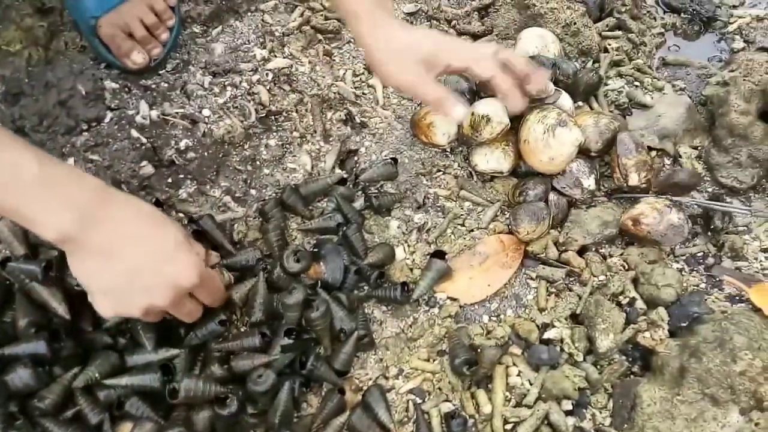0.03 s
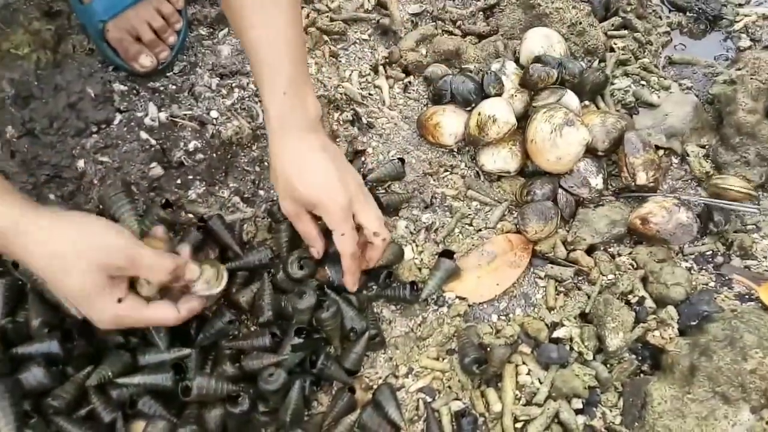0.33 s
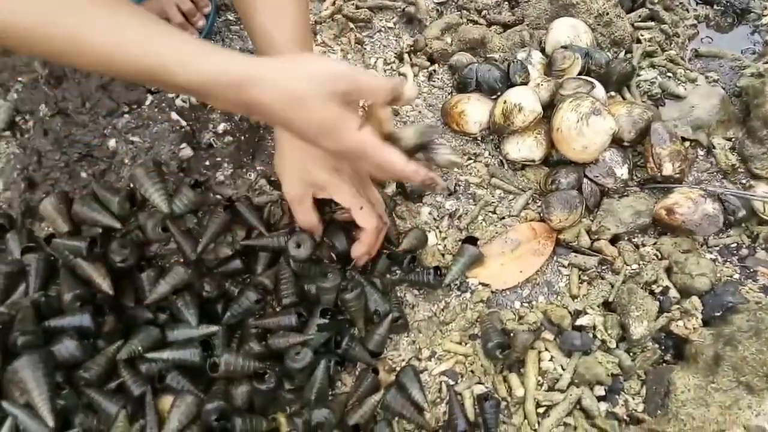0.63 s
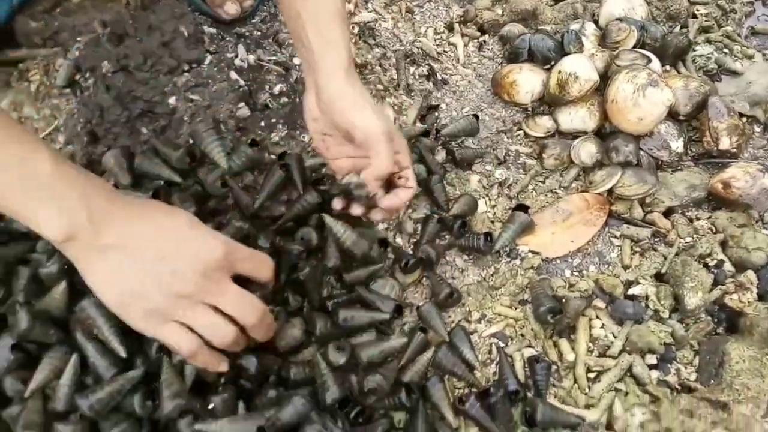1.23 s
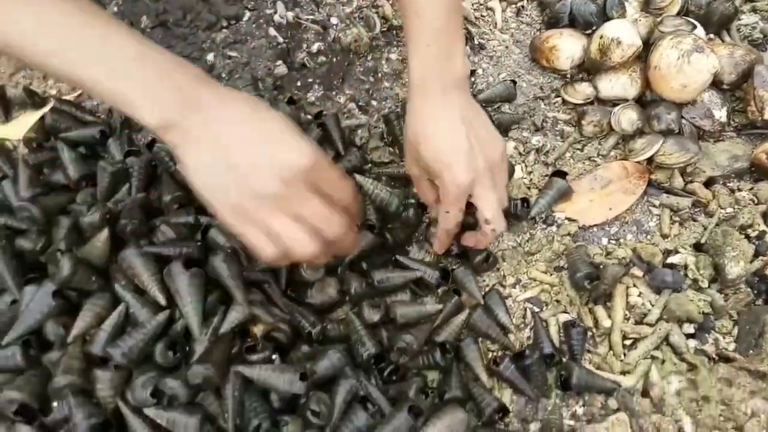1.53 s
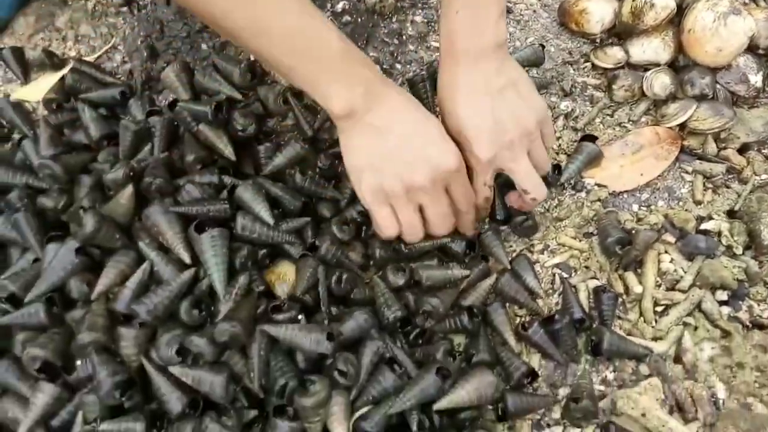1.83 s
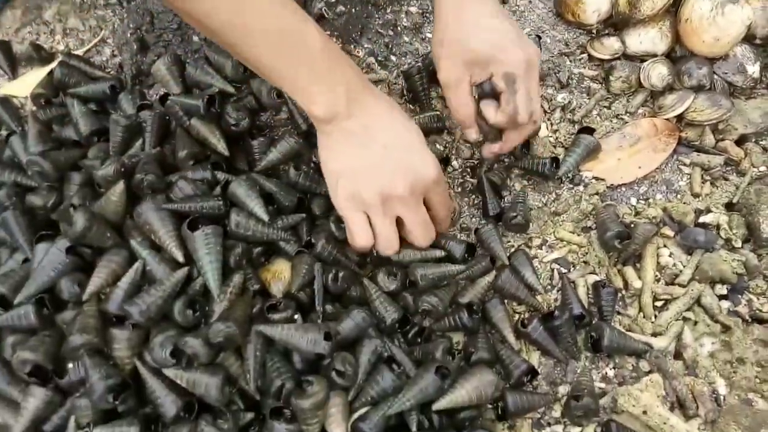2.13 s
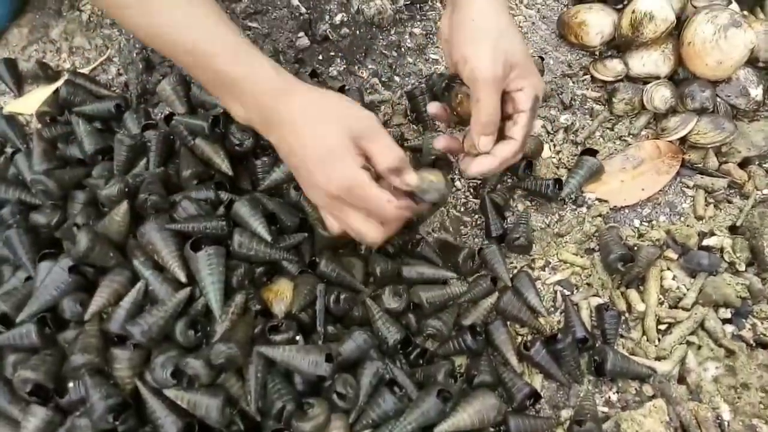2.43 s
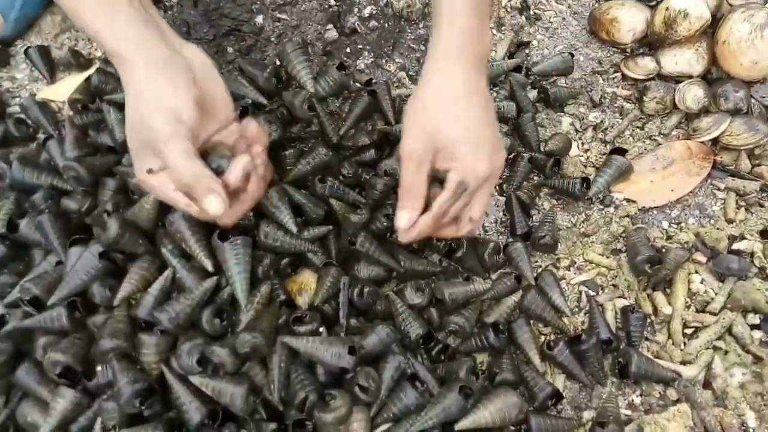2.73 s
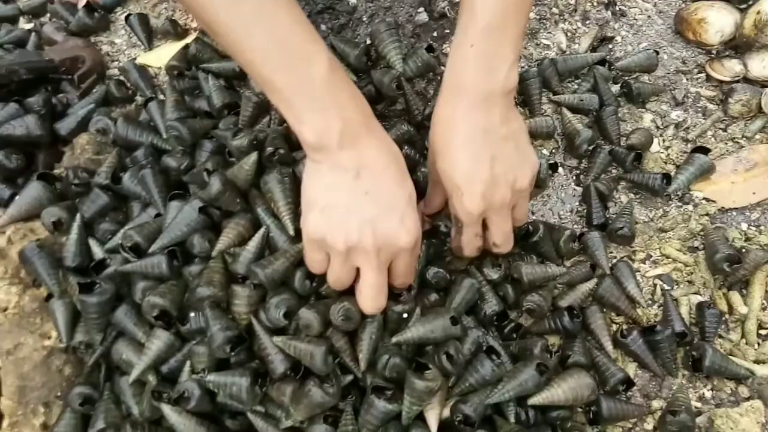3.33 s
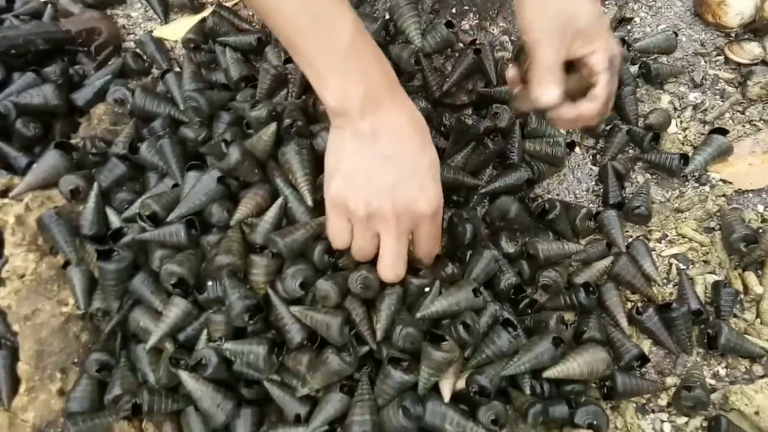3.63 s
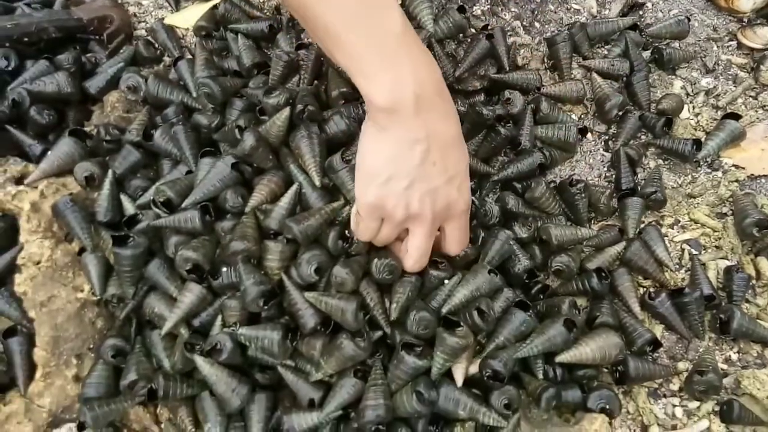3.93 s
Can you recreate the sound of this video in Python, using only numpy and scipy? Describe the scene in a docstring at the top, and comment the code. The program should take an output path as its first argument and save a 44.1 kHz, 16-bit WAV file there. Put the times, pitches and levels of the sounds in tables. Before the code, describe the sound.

Hands sort through a pile of snail shells, which click, knock and scrape together.

```python
"""Two hands rake through a heap of hard, pointed snail shells on open ground, over faint outdoor air.
From the start, shells knock on their neighbours, skid briefly and ring for a few milliseconds, while
the stirred heap swells into a clatter and grate beneath them. After a second the hands add dull bumps.
Near 2.4 s the heap almost settles; the raking goes on gently, then digs in again just before the end."""
import sys
import numpy as np
from scipy import signal
from scipy.fft import rfft, irfft
from scipy.io import wavfile

SR = 44100
rng = np.random.default_rng(int(sys.argv[2]) if len(sys.argv) > 2 else 0)


def output_pcm(signal):
    """Save a mono or channel-first signal as 16-bit PCM at the path in sys.argv[1].

    Samples are clipped to [-1, 1] before scaling.
    """
    pcm = np.clip(np.atleast_2d(signal).T, -1, 1) * 32767
    wavfile.write(sys.argv[1], SR, np.round(pcm).astype(np.int16))


N = 176400


def from_db(db):
    """Decibels to gain."""
    return 10 ** (np.asarray(db) / 20)


def rms_one(x):
    """Scale to an rms of 1."""
    return x / np.sqrt(np.mean(x ** 2) + 1e-20)


def one_ms(x):
    """Scale to the energy of one millisecond at full level."""
    return x / np.sqrt(np.sum(x ** 2) * 1000 / SR + 1e-20)


def add(out, start_s, x):
    """Mix a short sound in at its cue."""
    i = int(np.clip(start_s * SR, 0, N - 1))
    out[i:i + len(x)] += x[:N - i]


def band(x, hz, kind, order=4):
    """Butterworth filter."""
    return signal.sosfilt(signal.butter(order, hz, kind, fs=SR, output="sos"), x)


def equalise(x, curve):
    """Apply a smooth EQ curve, with minimum phase so that nothing sounds ahead of an attack."""
    hz, db = np.transpose(curve)
    size = len(x)
    bin_hz = np.arange(size // 2 + 1) * SR / size
    log_gain = np.log(from_db(np.interp(np.log(bin_hz + 1), np.log(hz), db)))
    causal = np.zeros(size)
    causal[0], causal[1:size // 2] = 1, 2
    response = np.exp(rfft(irfft(log_gain, size) * causal))
    return irfft(rfft(x) * response, size)


# Tone of the outdoor bed: frequency_hz, gain_db
AIR_EQ = [(25, -8.5), (60, -7), (110, 5.5), (170, 2.5), (260, -10), (600, -8), (2000, -9), (9000, -45),
          (15000, -13)]

def outdoor_air(level_db=-57):
    """A faint, steady bed of noise, weighted to the lows."""
    return from_db(level_db) * rms_one(equalise(rng.standard_normal(N), AIR_EQ))


# Dull bumps of the hands: start_s, level_db (before trim), pitch_hz
HAND_BUMPS = [(1.046, -38.5, 171), (1.224, -35, 108), (1.271, -39, 139), (1.346, -45.5, 94),
              (1.407, -45, 79.5), (1.66, -36, 170), (1.744, -36.5, 186.6), (1.774, -44, 197),
              (1.995, -40, 112), (2.197, -39.5, 107), (2.314, -39.5, 93), (3.512, -42.5, 176)]

def hand_bumps(rise_s=0.014, trim_db=-3.5):
    """A hand presses into the heap: a short swell of rough rumble around one low resonance."""
    out, t = np.zeros(N), np.arange(SR // 5) / SR
    swell = t / rise_s * np.exp(1 - t / rise_s)
    for start_s, level_db, pitch_hz in HAND_BUMPS:
        rumble = rms_one(band(rng.standard_normal(len(t)), [pitch_hz / 2, pitch_hz * 2], "band", order=2))
        resonance = np.sin(2 * np.pi * pitch_hz * t)
        add(out, start_s, from_db(level_db + trim_db) * swell * (.5 * rumble + .72 * resonance))
    return out


KNOCK_SAMPLES, LEAD_S = 2048, .004  # length of one knock; its scrape ahead of the hit
SHELL_LOWEST_HZ = 623  # a shell radiates little below this
LOWS_HZ, TREBLE_HZ = 2280, 7030  # crossovers between hollow lows, mid clack and hard treble


def contacts(per_s, spread_db):
    """Shell touching shell: random clicks of uneven size."""
    sizes = from_db(spread_db * np.minimum(rng.exponential(1, N), 3)) * rng.choice([-1, 1], N)
    return sizes * (rng.random(N) < per_s / SR)


def skid(decay_ms, contacts_per_s=5000):
    """Shells scrape together, meet hard once, and skid on in a dying run of smaller contacts."""
    hit = int(LEAD_S * SR)
    t_ms = (np.arange(KNOCK_SAMPLES) - hit) * 1000 / SR
    envelope = np.where(t_ms < 0, .3, .77) * np.exp(-np.abs(t_ms) / max(decay_ms, .1))
    force = envelope * rng.standard_normal(KNOCK_SAMPLES)
    force *= rng.random(KNOCK_SAMPLES) < contacts_per_s / SR
    force[hit] = 1
    return force


def mode(force, hz, t60_s):
    """One resonance that dies by 60 dB in t60_s; gain 1 at its peak."""
    r = from_db(-60 / (t60_s * SR))
    feedback = [1, -2 * r * np.cos(2 * np.pi * hz / SR), r * r]
    return signal.lfilter(np.array([1, 0, -1]) * (1 - r * r) / 2, feedback, force + 1e-18)


def shell(force, count=14, t60_s=0.0045):
    """No two shells are alike: each has its own scatter of short modes."""
    edges_hz = np.linspace(400, 16000, count + 1)
    modes_hz = rng.uniform(edges_hz[:-1], edges_hz[1:])
    gains = rng.uniform(0.26, 1, count) * (-1) ** np.arange(count)
    return sum(mode(force, hz, t60_s) * gain for hz, gain in zip(modes_hz, gains))


def main_ring(force, hz, skid_ms, detune=0.031, free_t60_s=0.0076, pinned_below_ms=0.45):
    """Two meeting shells ring close in pitch; a very short skid means they are pinned and damped."""
    t60_s = free_t60_s * np.clip(skid_ms / pinned_below_ms, .1, 1)
    return one_ms(mode(force, hz * (1 - detune), t60_s) - mode(force, hz * (1 + detune), t60_s))


def with_reflections(x, wet_db=-6, t60_s=0.043):
    """Add a short wash off the heap, the ground and the arms, different for every spot in the heap."""
    t = np.arange(KNOCK_SAMPLES) / SR
    wash = rng.standard_normal(len(t)) * from_db(-60 * t / t60_s) * (t > .002)
    wash /= np.sqrt(np.sum(wash ** 2))
    return x + from_db(wet_db) * signal.fftconvolve(x, wash)[:len(x)]


def small_knock(hz):
    """One tick in the heap: loose shells ping, pinned ones only click, and big, low ones are drier."""
    skid_ms = 3.4 * 2 ** rng.uniform(-2, 1)
    force = skid(skid_ms)
    looseness_db = rng.uniform(-7, 7)
    ping_db = -2 + 4.5 * np.log2(hz / 9500) + looseness_db
    ping = from_db(ping_db) * main_ring(force, hz, skid_ms)
    click = with_reflections(one_ms(shell(force)))
    return one_ms(click + ping)


def clatter(stir_db, full_stir_db=-33, full_per_s=700, shells=160):
    """Small knocks on shells of all pitches; harder stirring packs them thicker, at an even power."""
    voices = [small_knock(hz) for hz in np.linspace(1900, 12500, shells)]
    density = np.clip(from_db(1.1 * (stir_db - full_stir_db)), .15, 1)
    clicks = contacts(full_per_s * density, spread_db=3.3) / np.sqrt(density)
    struck, out = rng.integers(0, shells, N), np.zeros(N)
    for i in np.flatnonzero(clicks):
        add(out, i / SR, clicks[i] * voices[struck[i]])
    return rms_one(out)


# Tone of the shells, for the heap and the clear knocks alike: frequency_hz, gain_db
SHELL_EQ = [(50, -31), (120, -6), (330, -12.5), (780, -12.5), (1370, -9), (1780, -6.5), (3010, -1.5),
            (5730, -8), (6220, -8), (7970, -9.5), (10000, -3), (13500, -20), (15400, -11.5)]
# Level ride of the stirring, before trims: time_s, body_db, treble_db
STIRRING = [(0, -48.5, -47), (0.11, -48, -45), (0.17, -43.5, -51), (0.25, -38.5, -48), (0.33, -32.5, -51),
            (0.4, -32.5, -40), (0.502, -34, -40.5), (0.8, -36.5, -44), (0.85, -33.5, -38),
            (0.895, -45, -45), (0.97, -41, -37.5), (1.1, -36, -39.5), (1.22, -33, -32.5),
            (1.365, -38.5, -40), (1.41, -33, -37), (1.6, -34.5, -38), (1.68, -40.5, -43), (1.9, -41, -45.5),
            (2.03, -33.5, -39), (2.2, -41, -45.5), (2.275, -50, -51), (2.42, -59.5, -56.5),
            (2.56, -46.5, -48), (2.61, -40, -52.5), (2.75, -40.5, -47), (2.92, -44, -45.5),
            (3.02, -42.5, -49), (3.16, -46, -47.5), (3.23, -46.5, -40.5), (3.42, -46, -44.5),
            (3.68, -36.5, -42.5), (3.74, -33, -35.5), (3.92, -41.5, -44), (4, -39, -49)]

def stirred_heap(trim_db=-1, extra_treble_db=-2):
    """The heap shifts under the hands: a clatter of small knocks and the fine grating of ribbed shells."""
    time_s, *rides = np.transpose(STIRRING)
    body_db, treble_db = (np.interp(np.arange(N) / SR, time_s, db) + trim_db for db in rides)
    grit = from_db(-4.5) * rms_one(contacts(per_s=2500, spread_db=4.5))
    texture = equalise(clatter(body_db) + grit, SHELL_EQ)
    body = from_db(body_db) * rms_one(band(texture, TREBLE_HZ, "low"))
    treble = from_db(treble_db + extra_treble_db) * rms_one(band(texture, TREBLE_HZ, "high"))
    return body + treble


# Foreground hits, before trims; the hollow lows and hard treble are relative to the clack:
# hit_s, clack_db, hollow_db, hard_db, skid_ms, ring_hz, ring_db
CLEAR_KNOCKS = [(0.0209, -20.5, -4, -4.5, 2.6, 9200, -27), (0.083, -37, -14, -1, 1.5, 9630, -32),
                (0.1347, -23.5, -16, -9, 9.6, 4000, -28), (0.1782, -21, -14, -17, 1.9, 3530.0, -38),
                (0.1943, -23.5, -15.5, -14, 0.91, 2010, -22), (0.2597, -39, 13, 3, 1.6, 866, -26.5),
                (0.29, -26, -13, -3, 2.2, 2350.0, -26.5), (0.3242, -17, -33, -10, 2.9, 4170, -24),
                (0.3698, -17.5, -23, -6.5, 3.4, 1490, -29), (0.3824, -19.5, -12, -7, 8.8, 4300, -18),
                (0.4548, -17, -34, -10, 4.3, 6100, -25.5), (0.526, -19.5, -26, -10, 4.2, 3000, -24),
                (0.5675, -18, -28, -21, 3.8, 3100, -21), (0.7157, -15, -47, -13, 6.4, 2930, -17.5),
                (0.8318, -21.5, -18, 2, 5, 9200, -12.5), (0.8742, -22.5, -2.5, 4.5, 2.5, 8750, -23.5),
                (0.9055, -23, -13, -2, 0.13, 6000, -18.5), (0.9403, -25.5, -11, -4, 1.5, 8700, -31),
                (1.1007, -27.5, -7, 5, 6.3, 3610, -25.5), (1.166, -35, -15, 9, 3, 11100, -13.5),
                (1.1814, -23, -30, -9, 0.87, 4480, -20.5), (1.19, -23.5, -20, -2, 3.4, 9050, -25),
                (1.2134, -19, -29, -17, 1.6, 10000, -17), (1.2258, -27.5, -32, 11.5, 1.2, 3160, -19.5),
                (1.2375, -19, -30, -14, 3.4, 3130, -34), (1.263, -29, -23, -5, 0.63, 9600, -19.5),
                (1.3265, -21.5, -12, -13, 8.7, 4070, -24), (1.351, -32, -13, 2, 1.2, 8060, -27),
                (1.462, -34, -30, 10, 2.4, 3780, -29), (1.481, -29, -26, -1, 2.3, 5550, -26.5),
                (1.568, -23.5, -2, -1, 4.4, 1840, -29), (1.5885, -23.5, -33, -3, 2.6, 3680, -29),
                (1.637, -24.5, -9, 5, 2.7, 4980, -23.5), (1.7108, -33, -22, -23, 1.4, 3350, -26.5),
                (1.7884, -38.5, 6.5, 6, 1.3, 10100, -25), (1.8156, -21.5, -40, 1, 0.57, 8880, -25),
                (1.875, -35, -13.0, 8.5, 1.3, 3920.0, -23.5), (1.959, -23.5, -31, -4, 2.1, 3600, -23.5),
                (2.1203, -36, 5, 8, 3.3, 1400, -30.0), (2.137, -26, -12, -30, 3.5, 2920, -26.5),
                (2.2296, -18, -13, -12, 3, 4640, -25.5), (2.311, -34.5, -9, 1, 4.4, 3400, -38),
                (2.3488, -36, -3.5, -9, 3, 9560, -29), (2.5106, -30, -28, -4.5, 0.88, 3480, -34.5),
                (2.587, -22.5, -10, -11, 9.3, 3150, -21), (2.599, -42, -19, 4, 4.9, 3140, -25),
                (2.641, -23.5, -9, -6, 5.4, 1070, -35.5), (2.6842, -25.5, -3, -0.5, 0.8, 6680.0, -26),
                (2.7054, -20.5, -20, -3.5, 2.1, 4100, -27), (2.778, -33, -3.5, -1, 1.9, 3340, -30.5),
                (2.8038, -34.5, -15, 8, 0.67, 9300, -26), (2.824, -46, 8, -11, 6.4, 755, -34.5),
                (2.854, -31.5, -3.5, -9, 1.1, 6660, -30), (2.888, -35, 1, 2, 2.5, 4100, -32),
                (2.912, -34, -10, 8, 5.9, 3730, -30.5), (3.0605, -27, -7, -1, 6.7, 9400, -31.5),
                (3.0784, -25.5, -24, 4, 1.2, 6630, -31), (3.132, -38, 0, -18, 1.1, 4300, -33),
                (3.1844, -27, -16, -6, 1.7, 5160, -32), (3.2415, -43, -3, 15, 1.4, 8400, -32),
                (3.2666, -30.5, -6, 4.5, 1.7, 8000, -24.5), (3.3398, -32, -2, 4, 0.72, 2970, -30),
                (3.4068, -39.5, 3, -5, 2.3, 2490, -40), (3.532, -29, -7, -24, 5.4, 4200, -30.5),
                (3.5807, -28, -5.5, -20, 1.5, 3220, -24.5), (3.658, -18.5, -11, -27, 3.2, 6520, -18.5),
                (3.71, -18, -22, -8, 3.5, 5180, -23), (3.8509, -22, -20, 1, 1.8, 9560, -24.5),
                (3.974, -22.5, -10, -4, 6.2, 4180, -27.5)]

def clear_knocks(clack_trim_db=-1.7, ring_trim_db=1.4):
    """Two shells collide: a broad clack from both, and the ring of their main modes."""
    out = np.zeros(N)
    for hit_s, clack_db, hollow_db, hard_db, skid_ms, ring_hz, ring_db in CLEAR_KNOCKS:
        force = skid(skid_ms)
        pair = equalise(shell(force) + shell(force), SHELL_EQ)
        hollow = from_db(hollow_db) * one_ms(band(pair, [SHELL_LOWEST_HZ, LOWS_HZ], "band"))
        mids = one_ms(band(pair, [LOWS_HZ, TREBLE_HZ], "band"))
        hard = from_db(hard_db) * one_ms(band(pair, TREBLE_HZ, "high"))
        clack = with_reflections(from_db(clack_db + clack_trim_db) * (hollow + mids + hard))
        ring = from_db(ring_db + ring_trim_db) * main_ring(force, ring_hz, skid_ms)
        add(out, hit_s - LEAD_S, clack + ring)
    return out


def scene():
    """Outdoor air, shells and hands in one mono mix."""
    return (outdoor_air() + clear_knocks() + stirred_heap() + hand_bumps())[None]


def record(dry):
    """A steep high cut takes off the very top."""
    cutoff_hz = 15400
    return signal.sosfilt(signal.ellip(12, .2, 80, cutoff_hz, fs=SR, output="sos"), dry)


dry = scene()
out = record(dry)
output_pcm(out)
```